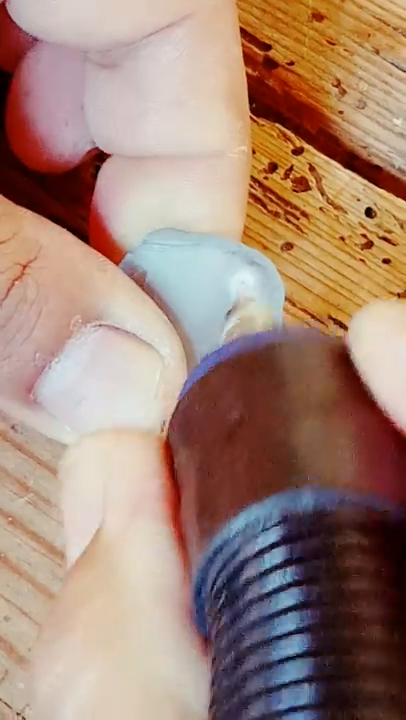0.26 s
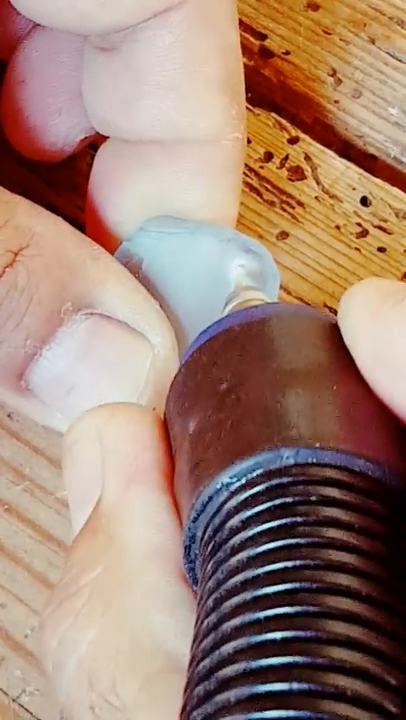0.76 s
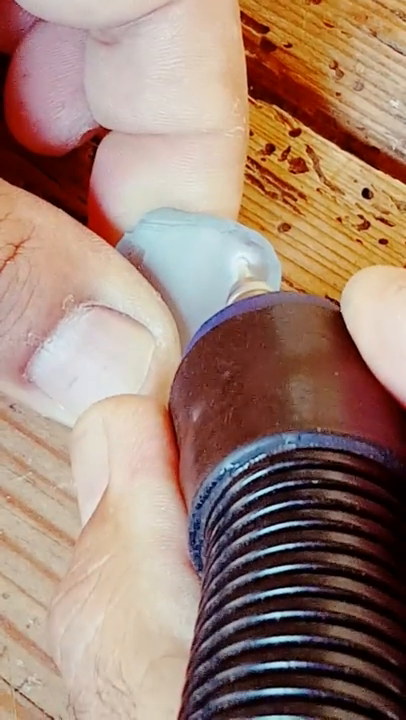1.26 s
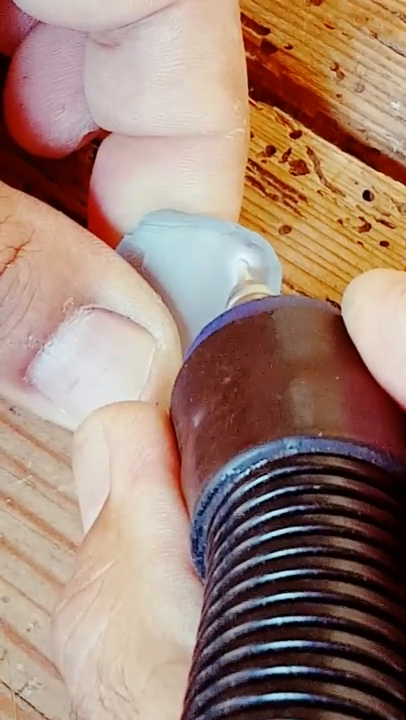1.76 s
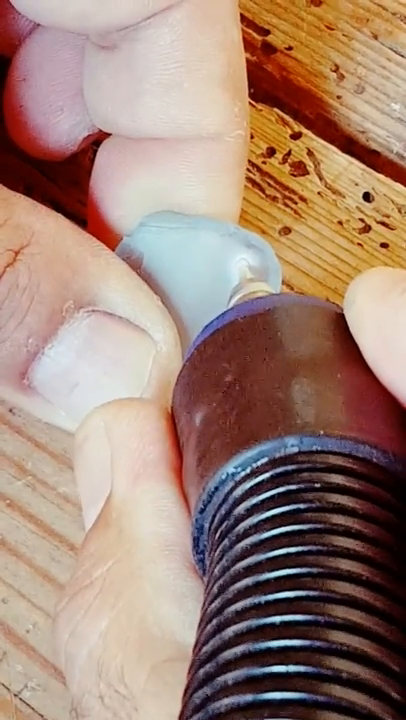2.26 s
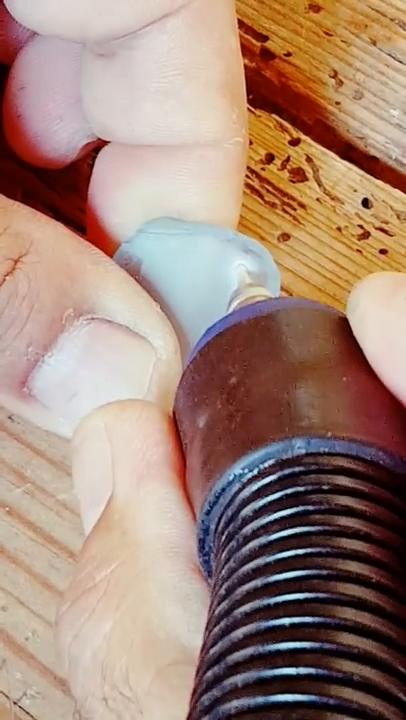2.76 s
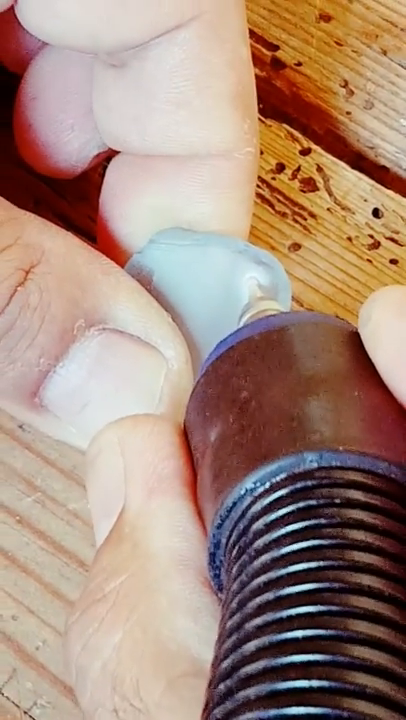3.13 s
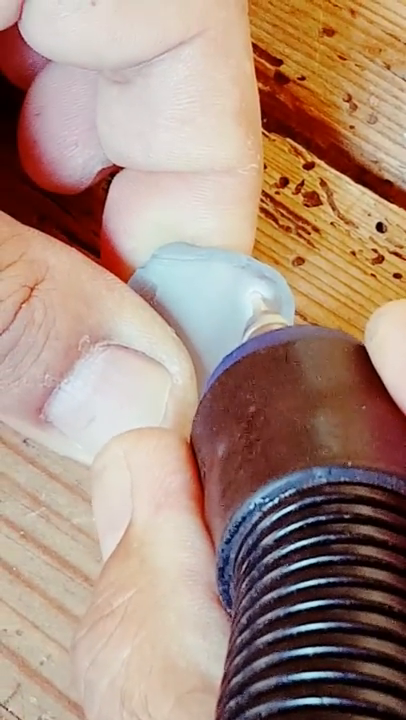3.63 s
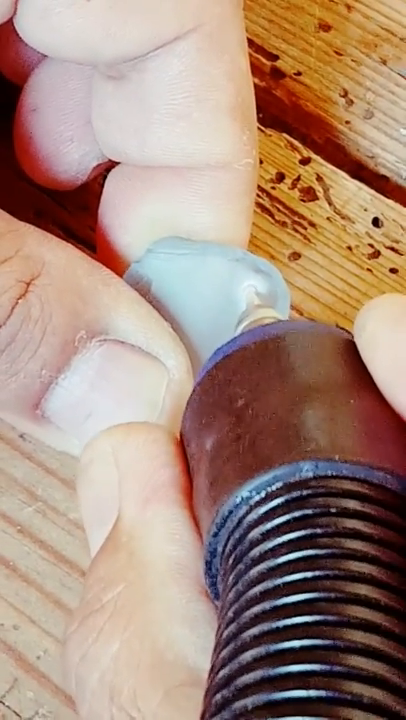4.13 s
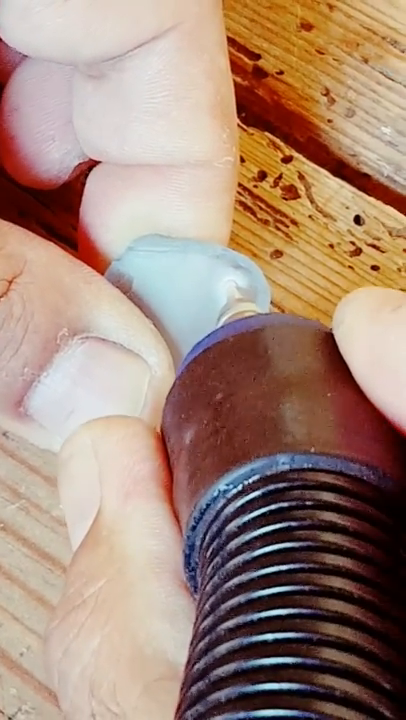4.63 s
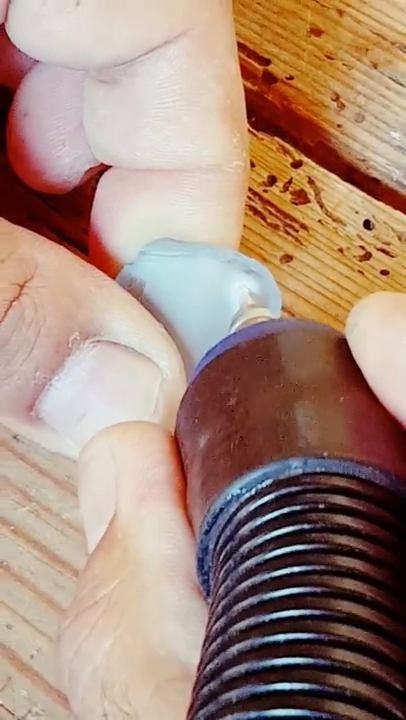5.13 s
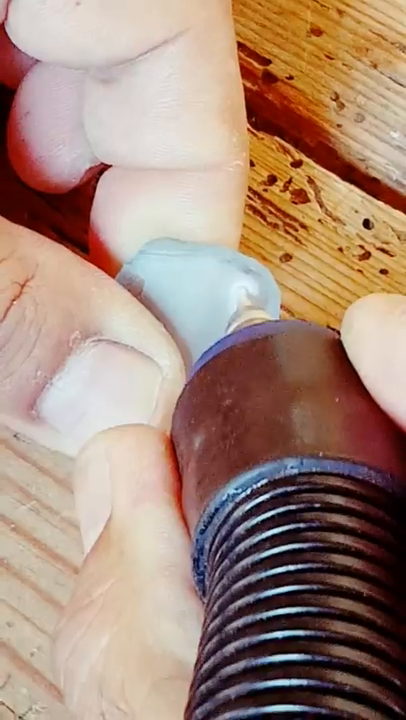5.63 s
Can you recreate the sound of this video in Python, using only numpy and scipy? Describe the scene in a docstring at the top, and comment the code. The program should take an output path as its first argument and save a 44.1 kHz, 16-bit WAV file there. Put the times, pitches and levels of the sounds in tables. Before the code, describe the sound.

Piercing, dentist-drill-like whine with airy hiss over a low workshop rumble; the burr briefly chatters and squeaks on stone, later bogging down for an instant.

```python
"""An air-turbine handpiece grinds a small stone, close to a pair of microphone ports.
From the start its shaft and five blades whine as sine orders of one speed, sagging as the burr bites;
exhaust air hisses as shaped noise, a fan hums as steady tones, and the workshop roars as resonant noise.
A soft bass thump comes first; after a second the burr chatters twice in half orders and the stone squeaks.
The handpiece briefly dips in level between squeaks, and in the second half it bogs down and thumps again."""
import sys
import numpy as np
from scipy import signal
from scipy.io import wavfile
from scipy.ndimage import uniform_filter1d

SR = 44100
rng = np.random.default_rng(int(sys.argv[2]) if len(sys.argv) > 2 else 0)


def pcm_store(signal):
    """Save signal as 16-bit PCM."""
    levels = np.round(np.clip(np.atleast_2d(signal), -1, 1) * 32767)
    wavfile.write(sys.argv[1], SR, levels.astype(np.int16).T)


N = 260190
T = np.arange(N) / SR  # s
BLADES = 5
USUAL_HZ = 1730  # shaft speed at which speed-dependent levels and leads are neutral

# Shaft speed, sagging each time the burr is pressed in. Each row: time in seconds, speed in Hz.
SPEED = [(0.0, 1707), (0.12, 1701), (0.215, 1743), (0.329, 1759), (0.708, 1764), (1.033, 1761),
         (1.217, 1738), (1.367, 1750), (1.566, 1752), (1.756, 1729), (1.826, 1707), (1.926, 1742),
         (2.125, 1744), (2.195, 1752), (2.42, 1729), (2.469, 1741), (2.549, 1727), (2.634, 1736),
         (2.684, 1711), (2.749, 1734), (2.859, 1721), (3.013, 1741), (3.113, 1717), (3.278, 1741),
         (3.347, 1729), (3.432, 1736), (3.492, 1682), (3.562, 1722), (3.682, 1734), (3.712, 1715),
         (3.737, 1603), (3.761, 1538), (3.831, 1661), (3.876, 1693), (4.031, 1706), (4.126, 1682),
         (4.24, 1731), (4.385, 1711), (4.495, 1720), (4.545, 1690), (4.644, 1729), (4.819, 1695),
         (4.894, 1711), (4.949, 1672), (5.044, 1722), (5.198, 1695), (5.398, 1737), (5.572, 1685),
         (5.652, 1695), (5.742, 1734), (5.822, 1704), (5.897, 1698)]
# Slow levels as hand and handpiece shift, before echo colour and flutter. Each row: time in seconds,
# shaft tone left and right in dB, blade tone left and right in dB, air noise in dB.
LEVELS = [(0.0, -19.5, -25, -17, -25, -18), (0.15, -19.5, -14, -19.5, -20.5, -17),
          (0.3, -17, -15, -19.5, -29.5, -20.5), (0.45, -17.72, -16, -20.5, -34, -21),
          (0.6, -17.5, -15.5, -18.5, -20, -22), (0.75, -18.5, -17, -22, -24, -20.5),
          (0.9, -18, -16.5, -17, -23, -21), (1.02, -17, -16.5, -21.5, -28, -20.5),
          (1.25, -17, -15.5, -19, -20, -19), (1.45, -14.5, -16.5, -20, -22, -20.5),
          (1.68, -18, -14, -19, -23.5, -20.5), (1.85, -18.5, -16.5, -22, -23, -19),
          (2.02, -16.5, -15.5, -16, -34.5, -19.5), (2.2, -16, -16.5, -18.5, -29, -22),
          (2.4, -16.5, -14, -18.5, -23, -20.5), (2.6, -19, -19.5, -15.5, -24.5, -20),
          (2.8, -19, -20, -16.5, -27.5, -20), (3.0, -18.5, -21, -13.5, -22, -20.5),
          (3.13, -18, -21, -16.5, -25, -20), (3.4, -16.5, -21.23, -15, -29, -19),
          (3.56, -22.5, -24, -16, -28, -20.5), (3.68, -16, -19, -17, -26, -20),
          (3.85, -23, -24.5, -17.5, -30.5, -20), (4.08, -20.5, -23, -17, -28, -20.5),
          (4.3, -21, -24, -18.5, -26, -21), (4.5, -19, -21, -16, -26.5, -21.5),
          (4.7, -20, -21.5, -15.5, -26.5, -19.5), (5.05, -19, -23, -17.5, -24.5, -19),
          (5.25, -18, -18.5, -15, -26, -19.5), (5.5, -19.5, -22, -17.5, -24, -18.5),
          (5.7, -18.5, -21, -16.5, -25.5, -19.5), (5.9, -20, -21, -15.5, -25, -19.5)]


def gain_of(db):
    """Decibels to gain."""
    return 10 ** (np.asarray(db) / 20)


def evened(x):
    """Scales to rms 1."""
    return x / np.sqrt(np.mean(x ** 2) + 1e-20)


def wander(low_hz, top_hz, t=T):
    """Irregular drift of rms 1: twenty sines of random phase between two rates."""
    rates = np.geomspace(low_hz, top_hz, 20)
    return evened(sum(np.sin(2 * np.pi * (rate * t + rng.random())) for rate in rates))


def bump(start, length):
    """A half-sine swell from 0 to 1 and back, times in seconds."""
    return np.sin(np.pi * np.clip((T - start) / length, 0, 1))


def tone(phase, left_db, right_db, lead):
    """A sine at both ports, levels as rms, the left ahead by lead in rad."""
    left = gain_of(left_db) * np.sin(phase + lead)
    right = gain_of(right_db) * np.sin(phase)
    return np.sqrt(2) * np.array([left, right])


def played(table, column, at=T):
    """One column of a table at every sample, corners rounded by inertia."""
    rows = np.array(table)
    return uniform_filter1d(np.interp(at, rows[:, 0], rows[:, column]), size=600)


def heard_db(column, hz):
    """Level of a main tone at one port: slow level plus the echo colour at the present speed."""
    # Echoes lift or cancel each tone depending on its pitch. Each row: shaft speed in Hz,
    # shaft tone left and right in dB, blade tone left and right in dB. Rows are not all in order of speed.
    echo_colour = [(1550, 2.5, 8.5, -6, -9), (1600.0, 3, 9, 2, -12), (1624, -0.5, -2, 2.5, -4.0),
                   (1695, 2.5, 1, 1, 2.5), (1692, 4, 1.5, -2.5, 5), (1727, 2.5, 2, -3.5, 2.5),
                   (1718.5, 0, 2, -2.5, 1), (1734.5, -0.5, -4.5, -1.9, 2.5), (1765, 1.2, 0, 1, -6),
                   (1749, -1.5, -2.5, 1.5, -3.5)]
    return played(LEVELS, column=column) + played(echo_colour, column=column, at=hz)


def shaft_tone(hz, turn):
    """Shaft imbalance: one cycle per turn, reaching the left port first."""
    grip_db = .6 * wander(8, 40)  # the hand's tremor changes the load on the burr
    left_db = heard_db(column=1, hz=hz) + grip_db
    right_db = heard_db(column=2, hz=hz) + grip_db + .45 * wander(8, 45)
    return tone(turn, left_db, right_db, lead=2.0)


def blade_tone(hz, turn):
    """Blade passing: five cycles per turn, its lead between the ports set by echoes off the hands."""
    # Each row: blade tone in Hz, lead of the left port in rad.
    blade_lead = [(8400, -1.1), (8500, -.1), (8600, 1.3), (8740, 2.8), (8820, 1.6)]
    lead = np.interp(BLADES * hz, *np.transpose(blade_lead))
    lead = lead - 3.4 * bump(.15, .4)  # rad; it swings across as the handpiece moves into place
    left_db = heard_db(column=3, hz=hz) + 1.35 * wander(8, 80)
    right_db = heard_db(column=4, hz=hz) + .8 * wander(5.4, 30)
    return tone(BLADES * turn, left_db, right_db, lead)


def weaker_orders(hz, turn):
    """The other multiples of shaft speed, the higher ones dying away as the shaft bogs down."""
    # Levels and leads hold at usual speed and in the middle of the scene, before flutter.
    # Each row: multiple, left dB, right dB, left lead in rad, dB gained per Hz of shaft speed,
    # rad gained per Hz, left and right dB gained per second as the handpiece slowly turns.
    orders = [(2, -35.5, -37, 3.2, -.13, .005, .3, 1), (3, -40.5, -40, -1.3, .03, -.02, -1.3, -.1),
              (4, -37, -38.5, -2.4, .02, .035, .2, -1.1), (6, -38, -50, 1.2, .05, 0, -.4, -.5),
              (7, -42.5, -44, -.5, .12, .06, -.2, -.2), (8, -41.5, -51, 2.2, -.1, .03, .7, -.6),
              (9, -35.5, -45, -1, 0, .03, 0, 0)]
    bogged_hz, middle_s = 1690, 3
    bog_db = .03 * np.minimum(hz - bogged_hz, 0)
    first_bite = bump(.01, .17)  # the even orders swell and swing in it
    out = np.zeros((2, N))
    for k, left_db, right_db, lead, slope, lead_slope, left_drift, right_drift in orders:
        bite = first_bite * (k % 2 == 0)
        lead = lead + lead_slope * (hz - USUAL_HZ) + .9 * bite + .06 * k * wander(1, 8)
        db = slope * (np.maximum(hz, bogged_hz) - USUAL_HZ) + k * bog_db + 2.5 * bite
        db = db + 1.8 * wander(3, 16) + 2.2 * wander(12, 90)  # surges and grit heard at both ports
        left_db = left_db + db + .22 * k * wander(3, 25) + left_drift * (T - middle_s)
        right_db = right_db + db + .22 * k * wander(3, 25) + right_drift * (T - middle_s)
        shake = .3 * wander(15, 100)  # rad; the burr jars the shaft and blurs each line
        out += tone(k * turn + shake, left_db, right_db, lead)
    return out


def chatter(turn):
    """The burr skips every other turn, giving half orders; the upper one comes first."""
    # Each row: start of the lower one in seconds, length in seconds, order 1/2 in dB, order 3/2 in dB.
    # Levels are the left port's at the top of the swell, before the unevenness.
    skips = [(1.157, 0.1, -40, -40), (1.685, 0.15, -34, -33.5)]
    upper_early_s = .022
    out = np.zeros((2, N))
    for start, length, db, upper_db in skips:
        db = db + 2.5 * wander(15, 80)  # the skipping is uneven
        out += bump(start, length) * tone(turn / 2, db, db + 2.5, lead=.3)
        upper = tone(3 * turn / 2, upper_db, upper_db - .6, lead=.44)
        out += bump(start - upper_early_s, length) * upper
    return out


def whine():
    """Every order is locked to the one turning phase of the shaft."""
    hz = played(SPEED, column=1)
    turn = 2 * np.pi * np.cumsum(hz) / SR
    return shaft_tone(hz, turn) + blade_tone(hz, turn) + weaker_orders(hz, turn) + chatter(turn)


def air(table, delay, patchy_db, swell_db):
    """Turbulence: random short-time spectra with drifting patches, partly shared by the ports."""
    size, hop = 1024, 256
    frames, hz = N // hop + 5, np.fft.rfftfreq(size, 1 / SR)
    f, *columns = np.transpose(table)
    left_db, right_db, same, lead = (np.interp(np.log(hz + 1), np.log(f), c)[:, None] for c in columns)
    a, b, c, d, patches = rng.standard_normal((frames, len(hz), 5)).T
    patches = uniform_filter1d(patches, size=24, axis=0)  # across frequency bins
    patches = evened(uniform_filter1d(patches, size=16, axis=1))  # across frames
    lag = np.exp(-1j * (lead + 2 * np.pi * hz[:, None] * delay))
    left = a + 1j * b
    right = same * lag * left + np.sqrt(1 - same ** 2) * (c + 1j * d)
    drift_db = patchy_db * patches + swell_db * wander(1.482, 9, np.arange(frames) * hop / SR)
    spectra = np.array([left * gain_of(left_db), right * gain_of(right_db)]) * gain_of(drift_db)
    return evened(signal.istft(spectra, nperseg=size, noverlap=size - hop)[1][:, :N])


def air_level_db():
    """Slow level of the air noise, sinking a little after the speed does."""
    db_per_hz, lag_s, slowest_hz = .0527, .029, 1680  # slower speeds sink it no further
    late_hz = np.maximum(played(SPEED, column=1, at=T - lag_s), slowest_hz)
    return played(LEVELS, column=5) + db_per_hz * (late_hz - USUAL_HZ)


def exhaust_hiss(air_db):
    """Air jetting from the head, reaching the right port by a longer path."""
    # Relative spectrum. Each row: frequency in Hz, left and right density in dB per Hz,
    # likeness of the ports from 0 to 1, left lead in rad beyond the delay.
    jet_spectrum = [(4500, -30, -32, .2, 1), (5500, -21, -22, .25, 1), (6100, -13, -15, .55, 2),
                    (6800, -5, -8, .45, 4), (7300, -7, -9.5, .4, 4.7), (7950, -4, -15.5, .35, 5.5),
                    (8350, 1, -4.5, .1, 5), (8800, -1.5, -7, .45, 4.3), (9400, -2, -9, .6, 3.7),
                    (10200, -9.5, -16, .12, 3), (10750, -3.5, -13, .3, 2), (11500, -9, -9.5, .65, 3.2),
                    (12100, -10, -10.5, .45, 4), (13100, -6, -12.5, .25, 3.8), (13750, -6, -16, .1, 3.5),
                    (14500, -7.5, -12.5, .43, 1), (15650, -6, -14, .35, 4.3)]
    noise = air(jet_spectrum, delay=23 / SR, patchy_db=.7, swell_db=.35)
    return gain_of(air_db + .8) * noise


def fan():
    """Steady motor tones at multiples of one rate, and a faint separate hum."""
    # Levels before the flutter. Each row: multiple, left dB, right dB.
    multiples = [(1, -46.5, -42), (4, -55, -50), (7, -39.5, -52)]
    fan_hz = 608.4
    lines = [(k * fan_hz, left_db, right_db) for k, left_db, right_db in multiples]
    lines.append((1362, -52, -52))  # the separate hum: Hz, dB, dB
    out = np.zeros((2, N))
    for hz, left_db, right_db in lines:
        left_db = left_db + 2.4 * wander(1.5, 25)
        right_db = right_db + 1.0 * wander(.47, 11)
        out += tone(2 * np.pi * hz * T, left_db, right_db, lead=.38)
    return out


def low_passed(x, hz):
    """The part below a corner frequency, without delay."""
    return signal.sosfiltfilt(signal.butter(2, hz, fs=SR, output="sos"), x)


def roar(air_db):
    """Workshop noise rings the room, its bass swells on its own and thumps come through the bench."""
    # Relative spectrum before the resonances. Each row: frequency in Hz, left and right density
    # in dB per Hz, likeness of the ports from 0 to 1, left lead in rad.
    roar_spectrum = [(25, -45, -54, .1, 0), (40, -31, -39, 0, 0), (60, -13.5, -19.5, 0, 0),
                     (110, -5.5, -11, .2, 0), (250, -3.5, -9.5, .3, .3), (560, -6.5, -15, .3, .3),
                     (1150, -9.3, -8, .55, .3), (1550, -8.5, -7.5, .25, 1.5), (1950, -11, -10.5, .12, 2.5),
                     (2450, -8.3, -6.5, .15, 3.2), (2900, -14, -12.5, .3, 3.3), (3600, -12, -14, .5, 3.1),
                     (4100, -10.8, -16, .3, 2.8), (4750, -13.3, -16.2, .15, 1), (5200, -21, -22, .2, 0),
                     (6000, -35, -35, .2, 0)]
    # Resonances that the roar excites. Each row: frequency in Hz, width in Hz, left and right gain in dB.
    room_modes = [(225, 18, -6, -5), (275, 26, -20, -4), (400, 18, -14, -2), (940, 50, -9, -20)]
    # Gain of the bass within the roar. Each row: time in seconds, gain in dB.
    bass_swell = [(0, 0), (1.2, -1), (1.85, -1), (2.58, 3.5), (3.45, -2), (3.51, 3), (3.57, -1), (4.6, 0.5),
                  (5.9, -1)]
    # Soft low thumps. Each row: start in seconds, length in seconds, peak in dB over the deepest roar.
    thumps = [(.535, .05, 4), (3.48, .06, 2)]
    noise = air(roar_spectrum, delay=0, patchy_db=.8, swell_db=.3)
    for hz, width, *db in room_modes:
        ringing = signal.lfilter(*signal.iirpeak(hz, hz / width, SR), noise)
        noise = noise + gain_of(db)[:, None] * ringing
    bass = low_passed(noise, 350)
    noise = noise + (gain_of(played(bass_swell, column=1)) - 1) * bass
    deep = low_passed(noise, 110)
    noise = noise + deep * sum(gain_of(db) * bump(start, length) for start, length, db in thumps)
    follows = .76  # share of the air noise changes, in dB, that the roar shows too
    return gain_of(-26.5 + follows * (air_db - air_db.mean())) * noise


def stone_squeaks():
    """The stone briefly sings in its grip: short rough squeaks that rise in pitch."""
    # Each row: start in seconds, middle pitch in Hz, length in seconds, peak in dB before the roughness.
    squeaks = [(1.272, 1090, .045, -32), (1.698, 1360, .032, -31), (1.796, 1150, .03, -26.5),
               (2.061, 1150, .022, -26), (2.082, 1130, .014, -29)]
    out = np.zeros((2, N))
    for start, hz, length, db in squeaks:
        rise = 4.5 * (T - start - length / 2)  # share of the pitch
        pitch = hz * (1 + .025 * wander(30, 200) + rise)
        rough = bump(start, length) * gain_of(3 * wander(40, 300))
        out += rough * tone(2 * np.pi * np.cumsum(pitch) / SR, db, db, lead=.47)
    return out


def scene():
    """Whine and hiss, dipping together once, with fan, roar and squeaks."""
    air_db = air_level_db()
    dip = gain_of(-4 * bump(1.66, .045))  # the handpiece's sound dips briefly
    handpiece = dip * (whine() + exhaust_hiss(air_db))
    return handpiece + fan() + roar(air_db) + stone_squeaks()


def record(dry):
    """A steep low-pass limits the band at 15745 Hz."""
    band_limit = signal.firwin(2047, 15745, window=("kaiser", 9), fs=SR)
    return signal.oaconvolve(dry, band_limit[None], "same")


dry = scene()
out = record(dry)
pcm_store(out)
```